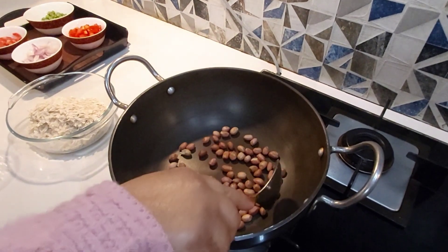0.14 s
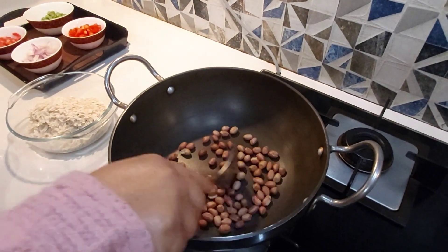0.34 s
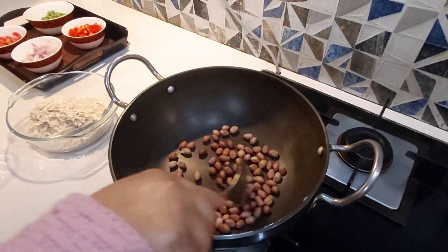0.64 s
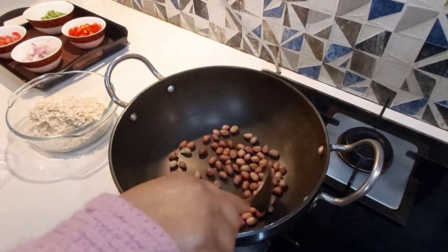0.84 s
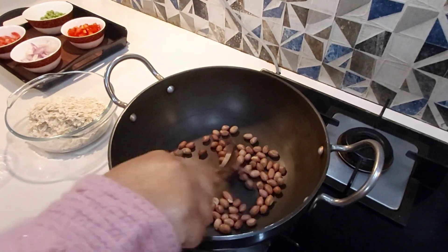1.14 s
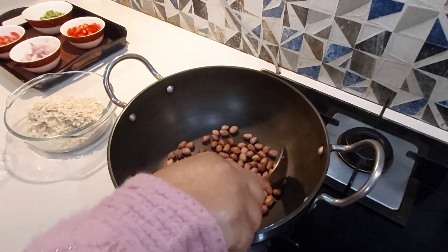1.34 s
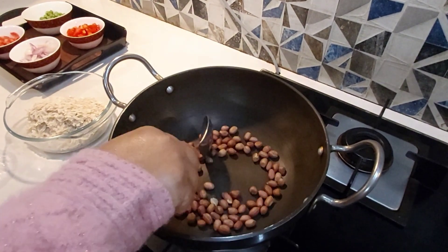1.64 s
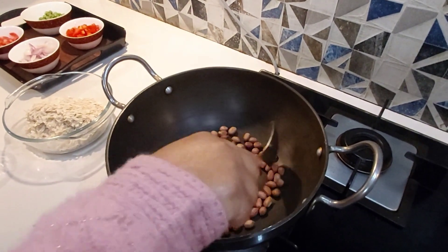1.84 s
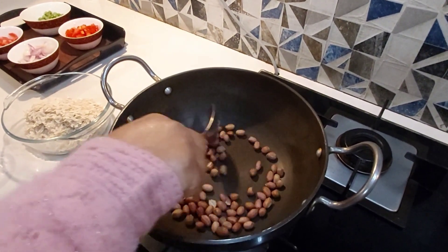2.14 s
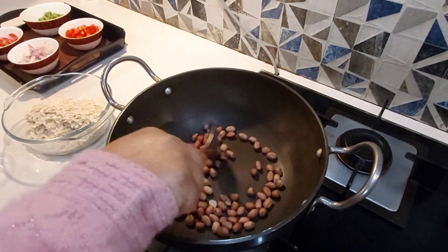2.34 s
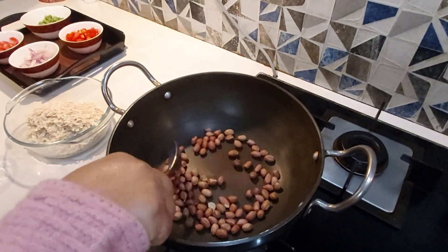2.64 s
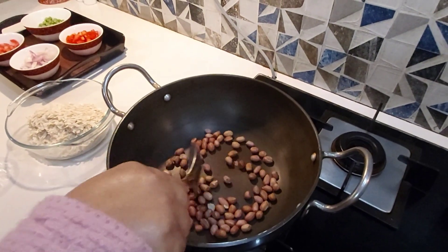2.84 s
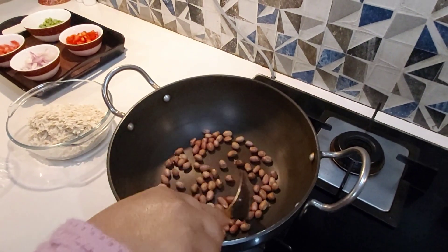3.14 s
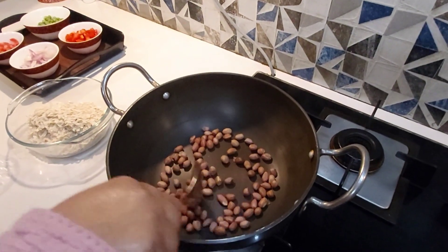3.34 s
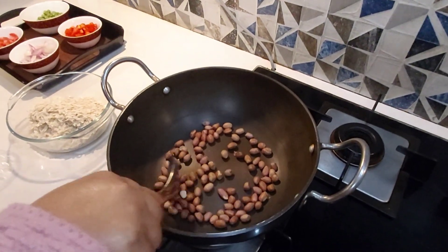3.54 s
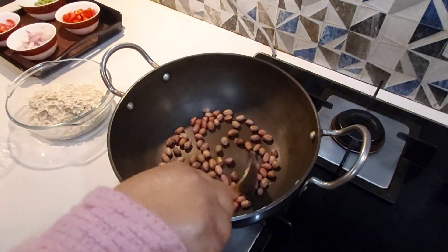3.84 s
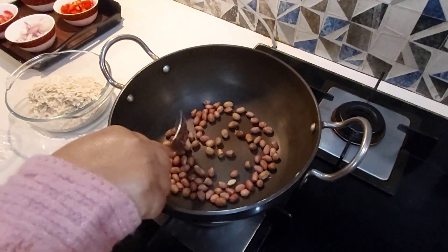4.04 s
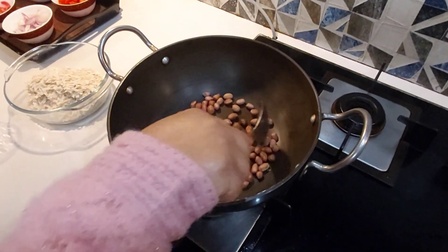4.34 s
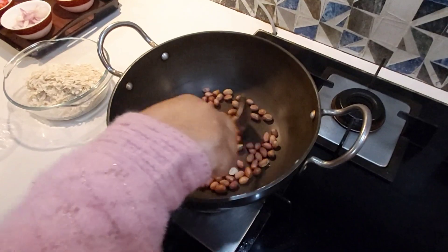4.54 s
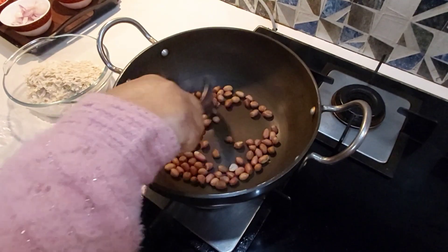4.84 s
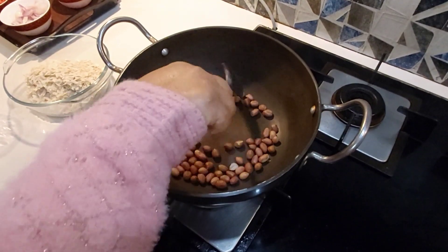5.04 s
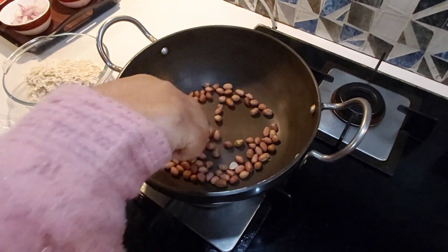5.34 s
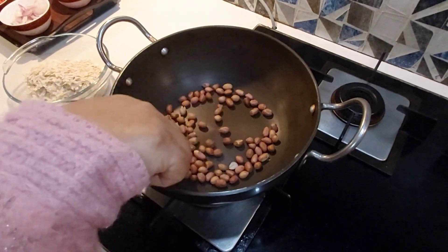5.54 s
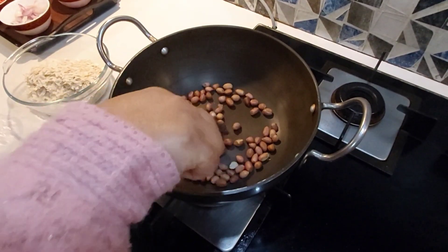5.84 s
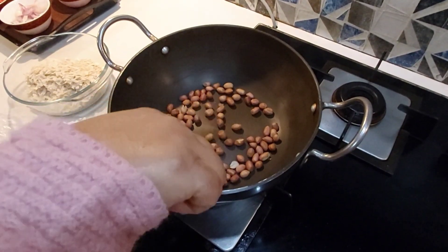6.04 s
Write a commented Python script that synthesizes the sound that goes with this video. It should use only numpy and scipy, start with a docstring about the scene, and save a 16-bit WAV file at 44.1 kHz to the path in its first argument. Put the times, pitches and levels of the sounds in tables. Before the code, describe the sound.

A steel dish clangs down and chatters, then a metal spoon stirs peanuts in a dry wok with quick clacks, rattles and scrapes.

```python
"""In a tiled kitchen, heard from just above a hob: a steel dish is put down nearby with a clang and chatters,
its decaying modes fluttering until they are damped. Then a steel spoon stirs peanuts in a dry metal wok, about
three strokes a second: clacks and knocks ring the pan's modes, tiny random contacts make the nuts rattle
and their skins rustle, and the pan rumbles on its stand. Scrapes, short squeaks and clicks come in between.
A soft background of coloured noise with a faint hum lies under everything."""
import sys
import numpy as np
from scipy import signal
from scipy.fft import rfft, irfft
from scipy.io import wavfile
from scipy.ndimage import uniform_filter1d

SR = 44100
rng = np.random.default_rng(int(sys.argv[2]) if len(sys.argv) > 2 else 0)


def file_out(sig):
    """Save sig as 16-bit WAV at sys.argv[1]."""
    # one column per channel
    cols = np.atleast_2d(sig).T
    # limit, then scale
    lim = np.clip(cols, -1, 1)
    pcm = np.round(lim * 32767).astype(np.int16)
    wavfile.write(sys.argv[1], SR, pcm)


N = 273147
TIME = np.arange(N) / SR

# Source levels are relative: each layer's balance, room and stereo place come on top.

# Spoon blows on the pan; hardness is treble over bass:
# [start_s, level_db, hardness_db, upper_over_lower_treble_db]
SPOON_KNOCKS = [(0.35, -31.5, 4, -3), (0.663, -38, 3.5, 1), (0.6814, -41, 5, -6), (0.9644, -33, -1.5, -6),
                (1.011, -51.5, 9, -1), (1.2032, -38.5, -5, 4), (1.464, -41.5, 7, 3),
                (1.4825, -41.5, 5.5, -8), (1.5682, -30.5, -2.5, -7), (1.6426, -38, 3.5, -7),
                (1.679, -44.5, 13.5, -12), (1.71, -34, -4, -10), (1.7561, -27, 0.5, -1),
                (1.7657, -33, -8, 9), (2.1042, -32, 11, -5), (2.1138, -38, 9, -12), (2.2569, -34, -7.5, -4),
                (2.4297, -26, 3, -1.5), (2.4484, -50, -8, -9), (2.4838, -49.5, 16, 6),
                (2.5079, -48.5, 15.5, -4), (2.7606, -39, -0.5, -5), (3.061, -40.5, -2, -7.5),
                (3.0946, -42.5, 0.5, -5), (3.1205, -40, 0.5, -3.5), (3.34, -33.5, 8, -10.5),
                (3.3475, -35, 4, -6.5), (3.636, -46, 11.5, -3.5), (3.6603, -37, 5.5, -4.5),
                (3.92, -48, 15, -6), (3.946, -32.5, -1.5, -4), (4.0406, -46.5, 5.5, -4),
                (4.2221, -55, 29, -7.5), (4.2609, -29.5, -3, -3), (4.2833, -25.5, -3.5, -5.5),
                (4.575, -37, 7, -7), (4.6, -28.5, -5.5, -11), (4.6498, -33, -3.5, -7),
                (4.6863, -41.5, 1, 1), (4.7468, -29.5, -5.5, -1.5), (4.8608, -28, 2.5, -4),
                (4.8794, -28.5, -9, -4), (5.2234, -45, 7, -7), (5.252, -27, 4, -12.5),
                (5.269, -26.5, 0, -3), (5.712, -42.5, -10, 7), (5.7542, -42, 1, -2),
                (5.7931, -41.5, -1.5, 3), (6.1475, -47, -12, 4)]
# Modes of the pan, damped by the nuts: [pitch_hz, level_db, t60_s]
PAN_MODES = [(986, -3.5, 0.042), (1080, 0.5, 0.13), (1131.5, -1, 0.059), (1453, -12.5, 0.098),
             (1942, 3.5, 0.033), (2031, -3, 0.049), (3090, -36, 0.024), (3326, -1.5, 0.032),
             (3910, -11, 0.046), (4440, -21.5, 0.028), (4847, -8, 0.012), (6214, -17, 0.026)]
# Dull, dense part of the pan's response: [pitch_hz, level_db]
PAN_BODY_COLOUR = [(100, 2.5), (350, 10.5), (750, -5.5), (1100, 6.5), (2500, 4.5), (4500, -15.5),
                   (6000, -23.5), (8000, -6.5), (16000, -4.5)]
# Middle modes of a blow: offset, and the share of the hardness that they take
CLINK_DB, CLINK_SHARE = -2.5, 0.69
TICK_DB = -19  # gritty tick, relative to the treble

# Strokes of the spoon: [start_s, push_length_s, landing_clack_db, nuts_rattle_db, skins_rustle_db,
# spoon_slide_db, pan_rumble_db]
STROKES = [(0.639, 0.053, -28, -47.5, -44, -59, -52), (0.923, 0.13, -28.5, -47.5, -49.5, -61, -54),
           (1.1677, 0.057, -30, -52, -57, -55.5, -58), (1.4489, 0.3, -34, -47.5, -51, -61, -50.5),
           (1.7557, 0.13, -29.5, -57, -60, -65, -43.5), (2.039, 0.18, -39.5, -48, -51.5, -51, -42),
           (2.3492, 0.18, -26.5, -47.5, -56, -52, -40), (2.704, 0.14, -44, -48.5, -54.5, -58.5, -49),
           (3.012, 0.07, -39, -56.5, -53, -61, -46.5), (3.3227, 0.084, -37, -54, -48, -55, -42.5),
           (3.601, 0.09, -40, -55, -52.5, -55.5, -45), (3.89, .15, -36.5, -48.5, -47, -54, -43),
           (4.2107, 0.096, -25.5, -43.5, -43, -54, -44.5), (4.5328, 0.23, -33.5, -45, -49.5, -57, -46),
           (4.839, 0.024, -32, -46, -40.5, -46, -43.5), (5.1752, 0.19, -31, -50.5, -54, -64, -37.5),
           (5.647, 0.26, -71, -51.5, -56, -63, -46.5), (6.088, 0.058, -72, -69, -83, -84, -66)]
# How each layer follows a stroke: [attack_s, mid_stroke_swell_db, push_sag_db_per_s, release_db_per_s]
RATTLE_SHAPE = (.04, 1, 3, 130)
RUSTLE_SHAPE = (.025, 3, 20, 180)
SLIDE_SHAPE = (.07, 3, 10, 170)
RUMBLE_SHAPE = (.01, 1.5, 40, 110)
# Between strokes the nuts keep settling at a steady low level
RATTLE_REST_DB, RUSTLE_REST_DB, SLIDE_REST_DB, RUMBLE_REST_DB = -69, -72, -83, -67

# Colour of the spoon landing among the nuts: [pitch_hz, level_db]
LANDING_COLOUR = [(300, -14.5), (1100, 1.5), (1550, -16), (2050, 5), (2600, -11.5), (3400, 5.5),
                  (4000, -0.5), (5100, -7.5), (6500, -13.5), (8500, -26), (16000, -34)]
# Colour of dry skins sliding: [pitch_hz, level_db]
RUSTLE_COLOUR = [(300, -23), (1500, -1.5), (2700, 3.5), (3300, -14), (4200, 1.5), (4900, -5), (5600, -9),
                 (6400, -7.5), (7500, -10.5), (16000, -22)]
# Hiss of the spoon edge on the metal: [pitch_hz, level_db]
SLIDE_COLOUR = [(1000, 2.5), (4000, -5), (6500, 3), (8000, -10.5), (11000, 2), (16000, -2)]

# The pan on its stand: [pitch_hz, level_db, t60_s]
STAND_MODES = [(65.7, -2, 0.085), (83.6, -5.5, 0.019), (110.2, -2, 0.054), (129, -5.5, 0.11),
               (137.6, -7.5, 0.13), (176, -3.5, 0.16), (246.4, -3.5, 0.065), (306, -12.5, 0.085),
               (414, -4.5, 0.027), (554, -10, 0.056)]
# The pan rocking against its stand: [start_s, level_db]
THUMPS = [(0.166, -36), (0.366, -38), (1.746, -38.5), (2.056, -41), (2.356, -34.5), (3.346, -30.5),
          (3.936, -33), (5.182, -30.5), (5.245, -40)]
# Rocking modes of the pan: [pitch_hz, level_db, t60_s]
ROCKING_MODES = [(62, -1, .3), (102, -6, .14), (127, -2.5, .18)]

# The spoon edge biting into a hard, hissing scrape: [start_s, level_db, length_s]
HARD_SCRAPES = [(.68, -54, .04), (1.775, -48, 0.03), (2.371, -46, .055), (2.465, -46, 0.04),
                (2.636, -62, 0.06), (4.575, -45, 0.055), (5.243, -49.5, 0.13), (5.73, -56.5, 0.11)]
# Hiss of a hard scrape: [pitch_hz, level_db]
BITE_COLOUR = [(3500, -7), (6000, -4.5), (9000, -4.5), (13400, 1), (16000, -1)]
# Squeaks of the spoon edge: [start_s, level_db, length_s]
SQUEAKS = [(5.652, -66, 0.025), (5.694, -58.5, 0.02), (5.747, -55, .028)]
SQUEAK_HZ, SQUEAK_WIDTH_HZ = 4400, 65

# The spoon edge dragging on the pan: [start_s, level_db, length_s]
DRAGS = [(0.982, -45, 0.072), (1.056, -42.5, 0.094), (1.195, -30, 0.049), (1.274, -54, 0.063),
         (1.594, -38.5, .07), (2.256, -38.5, .06), (2.799, -44.5, 0.084), (4.293, -44, 0.068),
         (4.67, -38.5, 0.09), (5.29, -42, 0.061), (5.427, -44, 0.063), (5.831, -40.5, 0.066)]
# The mode that a drag sets singing: [pitch_hz, level_db]
SINGING_COLOUR = [(900, -50), (1040, -6), (1070, 5), (1085, 15), (1100, -7), (1130, -12), (1300, -16.5)]

# Single nuts snapping out from under the spoon: [start_s, peak_level_db]
SNAPS = [(0.808, -33.5), (0.894, -40), (1.068, -39), (1.68, -35), (1.8158, -22.5), (2.06, -34),
         (2.1908, -25), (2.43, -39), (3.662, -30.5), (4.2851, -19.5), (4.601, -32), (4.632, -38),
         (4.865, -27)]
# Colour of a snap: [pitch_hz, level_db]
SNAP_COLOUR = [(300, -29), (1500, -9), (3000, -1), (5500, 2), (8000, -12), (16000, -17)]

# Steel dish touching down and chattering: [start_s, clatter_level_db]
DISH_HITS = [(.01, -40.5), (0.106, -30.5), (0.124, -28.5), (0.1444, -7.5), (0.151, -25.5), (0.168, -14.5),
             (0.181, -17.5), (.198, -18.5), (0.213, -17.5), (0.24, -22)]
# Ringing modes of the dish, led by two low thuds of the counter or stove beneath it: [pitch_hz, level_db,
# t60_s]
DISH_MODES = [(245, -15, .45), (317, -20, .5), (1484, -18, .55), (1597, -20, .5), (1944, -20, .55),
              (2071, -20, .5), (2507, -9, .55), (2528, 0, .57), (2561, -3, .56), (5326, -14, .54),
              (5349, -18, .5), (7407, -17, .36), (7432, -21, .36), (8527, -30, .3), (11382, -16, .26),
              (11420, -22, .26), (12280, -33, .27), (15140, -22, .22), (15169, -18, .22)]
# Colour of the dish clattering on the counter: [pitch_hz, level_db]
CLATTER_COLOUR = [(40, -39), (90, -5), (195, -12.5), (250, 1.5), (330, -9), (450, -5), (750, -7),
                  (1050, -9), (1550, 1), (2300, 4), (3200, -4.5), (5000, -6), (6800, -9), (9000, -19.5),
                  (16000, -48.5)]
DISH_LANDS_S, DISH_RING_DB = .1445, -13.5  # the landing that sets the dish ringing
# The ring flutters irregularly as the dish settles: fastest rate, and rms depth
DISH_FLUTTER_TOP_HZ, DISH_FLUTTER_DEPTH = 22.4, 0.58
DISH_STILL_S, DISH_STILL_T60_S = 0.51, .12  # then it is damped and the ring stops

# Colour of the kitchen background: [pitch_hz, level_db_per_hz]
AIR_COLOUR = [(20, -47), (38, -34), (60, -15), (130, -6.5), (270, 1.5), (450, -2.5), (750, -13),
              (1500, -14), (3000, -30), (6000, -21), (8000, -31), (16000, -42)]
# Level of the kitchen background: [time_s, level_db]
AIR_LEVEL = [(0, -58), (1.4, -66.5), (2.9, -57), (5.5, -58.5), (6.2, -56)]
# Reverberation of the kitchen: [pitch_hz, t60_s]
ROOM_T60 = [(200, 0.77), (1000, 0.58), (2500, 0.67), (5000, 0.62), (9000, 0.48), (16000, 0.72)]
# Flat colour: [pitch_hz, level_db]
WHITE = [(20, 0), (20000, 0)]
TOP_HZ = 16200  # top of the microphone's range


def undb(db):
    """Decibels to gain."""
    return 10 ** (np.asarray(db) / 20)


def unit(x):
    """Scale to rms 1."""
    return x / np.sqrt(np.mean(x ** 2))


def impulse(x):
    """Scale a response to energy 1 in each channel."""
    return x / np.sqrt(np.sum(x ** 2, axis=-1, keepdims=True))


def burst(x, length_s):
    """Scale a short sound to the energy of rms 1 held for length_s."""
    return impulse(x) * np.sqrt(length_s * SR)


def left_over_right(db):
    """Channel gains for a left-minus-right level."""
    return undb(np.array([[db], [-db]]) / 2)


def curve(rows, axis=1):
    """One column of a table, joined by straight lines in time."""
    rows = np.array(rows)
    return np.interp(TIME, rows[:, 0], rows[:, axis])


def add(track, start_s, sound):
    """Mix a sound into a track at its start time."""
    i = int(start_s * SR)
    track[:, i:i + sound.shape[1]] += sound[:, :N - i]


def convolve(x, response):
    """Pass a sound through a stereo response."""
    return signal.fftconvolve(np.atleast_2d(x), response, axes=1)[:, :N]


def band(x, lo_hz, hi_hz):
    """Causal band-pass."""
    edges = [lo_hz, min(hi_hz, SR / 2 - 100)]
    return signal.sosfilt(signal.butter(2, edges, "band", fs=SR, output="sos"), x)


def noise(colour, size, alike_hz=750):
    """Coloured stereo noise; long waves reach both microphones alike."""
    hz = np.fft.rfftfreq(size, 1 / SR) + 1
    points, db = np.transpose(colour)
    common, *own = rfft(rng.standard_normal((3, size)))
    share = 1 / (1 + (hz / alike_hz) ** 2)
    both = np.sqrt(share) * common + np.sqrt(1 - share) * np.array(own)
    gain = undb(np.interp(np.log(hz), np.log(points), db))
    return unit(irfft(both * gain, size))


def fade(t, t60):
    """Exponential decay, 60 dB down after t60 seconds."""
    return np.exp(-np.log(1000) * t / t60)


def ring(modes, t, phase):
    """Decaying sine modes; each takes a phase for each microphone."""
    total = 0
    for (hz, db, t60), p in zip(modes, phase):
        total = total + undb(db) * fade(t, t60) * np.sin(2 * np.pi * hz * t + p[:, None])
    return total


def contacts(per_s, spread_db):
    """Random tiny impacts, many weak and a few strong."""
    chance = rng.random(N)
    size = np.minimum(rng.exponential(size=N), 4)
    return unit((chance < per_s / SR) * undb(spread_db * size) * rng.choice([-1, 1], N))


def grains(colour, per_s, spread_db):
    """A crackle of very short clicks of one colour."""
    t = TIME[:128]
    click = noise(colour, len(t)) * fade(t, 0.015)
    return unit(convolve(contacts(per_s, spread_db), click))


def arch(db, length_s):
    """A level that swells and fades once."""
    return undb(db) * np.hanning(int(length_s * SR))


def effort(shape, rest_db, axis):
    """Gain of one layer: each stroke takes hold, swells where the spoon is fastest, sags and dies away."""
    attack_s, swell_db, sag_db_per_s, release_db_per_s = shape
    power = np.full((1, N), undb(rest_db) ** 2)
    t = TIME[None, :SR]
    for row in STROKES:
        start_s, length_s = row[:2]
        pushed = np.minimum(t, length_s)
        speed = np.sin(np.pi * pushed / length_s)
        db = row[axis] + swell_db * (speed - .5) - sag_db_per_s * pushed
        db = db - release_db_per_s * (t - pushed)
        add(power, start_s, (np.minimum(t / attack_s, 1) * undb(db)) ** 2)
    return np.sqrt(power[0])


def kitchen(x, wet_db, early_db):
    """Direct sound, quick reflections from wall tiles and counter, and a diffuse tail."""
    t = TIME[:SR]
    hz, when, cells = signal.stft(noise(WHITE, SR), SR, nperseg=256)
    points, t60 = np.transpose(ROOM_T60)
    decay = fade(when, np.interp(np.log(hz + 1), np.log(points), t60)[:, None])
    tail = signal.istft(cells * decay, SR)[1][:, :SR]
    tail = tail * (1 - fade(t, 0.035))
    early = noise(WHITE, SR) * fade(t, 0.11) * (t > .002)
    return x + convolve(x, undb(wet_db) * impulse(tail) + undb(early_db) * impulse(early))


def pan_response(body_db, body_t60, detune):
    """One blow on the pan: the place struck sets the share of each mode, over a short dense crack."""
    t = TIME[:SR // 6]
    modes = np.array(PAN_MODES)
    chance = rng.standard_normal((len(modes), 2))
    height = np.sqrt(modes[:, 0] / modes[:, 0].max())  # short waves feel the contact point most
    modes[:, 0] *= 1 + detune * height * chance[:, 0]  # the load of nuts and spoon shifts the pitch
    modes[:, 1] += 5 * height * chance[:, 1]
    tones = ring(modes, t, rng.uniform(0, 2 * np.pi, (len(modes), 2)))
    crack = noise(PAN_BODY_COLOUR, len(t)) * fade(t, body_t60)
    swell = 1 - fade(t, 0.0089)  # bending waves take a moment to fill the pan
    return impulse(tones * swell) + undb(body_db) * impulse(crack * swell)


def spoon():
    """Each blow rings the pan; the harder the contact, the more of its upper modes and of a gritty tick."""
    out, t = np.zeros((2, N)), TIME[:SR // 6]
    for start_s, db, hardness_db, upper_db in SPOON_KNOCKS:
        blow = pan_response(body_db=-7.5, body_t60=0.023, detune=0.014)
        low = burst(band(blow, 336, 1930), length_s=0.004)
        middle = burst(band(blow, 1735, 2550), length_s=0.0037)
        middle = undb(CLINK_DB + CLINK_SHARE * hardness_db) * middle
        clack = impulse(band(blow, 2880, 3850)) + undb(upper_db) * impulse(band(blow, 4180, 5700))
        high = burst(clack * fade(t, 0.082), length_s=0.0014)  # the resting spoon damps the upper modes
        grit = band(noise(SLIDE_COLOUR, len(t)), 3200, 19000) * fade(t, .03) * (1 - fade(t, .008))
        tick = undb(TICK_DB) * burst(grit, length_s=0.00023)
        add(out, start_s, undb(db) * (low + middle + undb(hardness_db) * (high + tick)))
    return kitchen(out, wet_db=-5.5, early_db=-2.5) * left_over_right(-5.0)


def landings():
    """Each stroke opens with a dry clack: the nuts cushion the spoon, so the pan hardly rings."""
    out, t = np.zeros((2, N)), TIME[:SR // 6]
    for start_s, _, db, *_ in STROKES:
        clack = noise(LANDING_COLOUR, len(t)) * fade(t, 0.043) * (1 - fade(t, 0.0044))
        add(out, start_s, undb(db) * burst(clack, length_s=0.00067))
    return kitchen(out, wet_db=-4, early_db=-3.5) * left_over_right(-6.0)


def nuts():
    """Nuts tumble against many places of the pan while their skins and the spoon slide over it."""
    rattle = 0
    for _ in range(10):  # places on the pan
        hits = contacts(per_s=40, spread_db=5.0)
        rattle = rattle + convolve(hits, pan_response(body_db=-5.5, body_t60=0.014, detune=0.03))
    rattle = unit(band(rattle, 258, 3600)) * effort(RATTLE_SHAPE, RATTLE_REST_DB, axis=3)

    rustle = unit(sum(grains(RUSTLE_COLOUR, per_s=130, spread_db=2.5) for _ in range(6)))
    rustle = rustle * effort(RUSTLE_SHAPE, RUSTLE_REST_DB, axis=4)

    slide = grains(SLIDE_COLOUR, per_s=1700, spread_db=6.0) + undb(5.0) * noise(SLIDE_COLOUR, N)
    slide = unit(slide) * effort(SLIDE_SHAPE, SLIDE_REST_DB, axis=5)

    tumbling = undb(2.5) * kitchen(rattle, wet_db=-16.5, early_db=-4)
    tumbling = tumbling + undb(-2.5) * kitchen(rustle, wet_db=-25.5, early_db=-5)
    sliding = undb(-2.0) * kitchen(slide, wet_db=-26, early_db=-18)
    return tumbling * left_over_right(-4.5) + sliding * left_over_right(-6.5)


def stand():
    """The push of each stroke makes the pan judder on its stand; separate thumps rock it."""
    t = TIME[:SR // 2]
    response = ring(STAND_MODES, t, np.zeros((len(STAND_MODES), 2)))
    judder = convolve(contacts(per_s=170, spread_db=2.0), response)
    # Even out the level, so that the stroke alone sets its strength
    judder = judder / np.sqrt(uniform_filter1d(judder ** 2, SR // 12) + 1e-9)
    judder = undb(-0.5) * band(judder, 55.0, 2500) * effort(RUMBLE_SHAPE, RUMBLE_REST_DB, axis=6)
    rocking = ring(ROCKING_MODES, t, np.zeros((len(ROCKING_MODES), 2)))
    rocking = rocking * (1 - fade(t, 0.042))  # a slow push moves only the lowest modes
    for start_s, db in THUMPS:
        add(judder, start_s, undb(db) * rocking)
    return kitchen(judder, wet_db=-10, early_db=-10.5) * left_over_right(-8.0)


def scrapes():
    """Pressed hard, the spoon edge hisses over the metal; now and then it sticks and squeaks."""
    out = np.zeros((2, N))
    for start_s, db, length_s in HARD_SCRAPES:
        swell = arch(db, length_s)
        add(out, start_s, swell * noise(BITE_COLOUR, len(swell)))
    for start_s, db, length_s in SQUEAKS:
        swell = arch(db, length_s)
        tone = band(noise(WHITE, SR), SQUEAK_HZ - SQUEAK_WIDTH_HZ / 2, SQUEAK_HZ + SQUEAK_WIDTH_HZ / 2)
        add(out, start_s, swell * unit(tone[:, -len(swell):]))
    return kitchen(out, wet_db=-8.5, early_db=-3) * left_over_right(-8)


def drags():
    """Friction of the spoon edge keeps the pan's strongest mode singing for a moment."""
    out = np.zeros((2, N))
    for start_s, db, length_s in DRAGS:
        size = int(length_s * SR)
        tone = band(noise(SINGING_COLOUR, SR), 810, 1350)[:, -size:]
        grip = np.sin(np.pi * np.sqrt(np.linspace(0, 1, size))) ** 2  # bites quickly, lets go slowly
        add(out, start_s, undb(db) * unit(tone * grip))
    return undb(-7) * kitchen(out, wet_db=-6.5, early_db=-23) * left_over_right(-5)


def snaps():
    """A pinched nut slips free with a dry noise click that does not ring the pan."""
    out, t = np.zeros((2, N)), TIME[:SR // 20]
    for start_s, db in SNAPS:
        click = noise(SNAP_COLOUR, len(t)) * fade(t, 0.0046) * (1 - fade(t, 0.0071))
        add(out, start_s, undb(db) * click / np.abs(click).max())
    return kitchen(out, wet_db=-7.5, early_db=-2.5) * left_over_right(-7)


def dish():
    """The dish chatters on the counter; its close pairs of modes swell, beat and flutter until it lies still."""
    t = TIME[:SR]
    clatter, tones = np.zeros((2, 2, N))
    for start_s, db in DISH_HITS:
        hit = noise(CLATTER_COLOUR, len(t)) * fade(t, 0.029) * (1 - fade(t, 0.0045))
        hit = band(hit, 30, 16000 * undb(0.77 * db))  # softer contacts are duller
        add(clatter, start_s, undb(db) * hit)

    modes = 0
    for mode in DISH_MODES:
        flutter = unit(band(rng.standard_normal(SR), 4, DISH_FLUTTER_TOP_HZ))
        modes = modes + ring([mode], t, np.zeros((1, 2))) * (1 + DISH_FLUTTER_DEPTH * flutter)
    swell = 1 - fade(t, .07)
    add(tones, DISH_LANDS_S, undb(DISH_RING_DB) * modes * swell)
    tones *= fade(np.maximum(TIME - DISH_STILL_S, 0), DISH_STILL_T60_S)

    tones = kitchen(tones, wet_db=-9, early_db=-22) * left_over_right(-6)
    return kitchen(clatter, wet_db=2.5, early_db=-3.0) * left_over_right(-3) + tones


def low_note():
    """A soft low note, one decaying sine, rings briefly early in the stirring."""
    out, t = np.zeros((2, N)), TIME[:SR]
    note = ring([(288, -47.5, 0.78)], t, np.zeros((1, 2)))
    add(out, .69, note * (1 - fade(t, 0.1)))
    return out * left_over_right(-5)


def air():
    """Soft kitchen background: coloured noise with a faint steady hum, under one slow level curve."""
    hum = undb(-4.5) * np.sin(2 * np.pi * 246 * TIME)
    return (noise(AIR_COLOUR, N) + hum) * undb(curve(AIR_LEVEL)) * left_over_right(-8.0)


def scene():
    """Everything heard from just above the pan."""
    stirring = spoon() + landings() + nuts() + stand()
    details = scrapes() + drags() + snaps()
    return stirring + details + dish() + low_note() + air()


def record(dry):
    """The phone microphone thins the deepest bass, gently rounds the loudest peaks and cuts the top."""
    thin = signal.sosfilt(signal.butter(3, 45, "high", fs=SR, output="sos"), dry)
    rounded = 1.3 * np.tanh(thin / 1.3)
    return signal.sosfilt(signal.ellip(10, .2, 80, TOP_HZ, fs=SR, output="sos"), rounded)


dry = scene()
out = record(dry)
file_out(out)
```